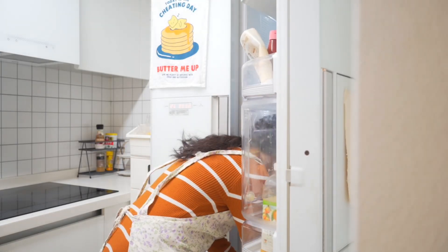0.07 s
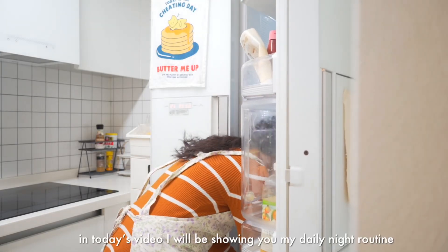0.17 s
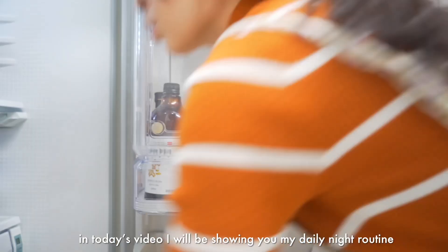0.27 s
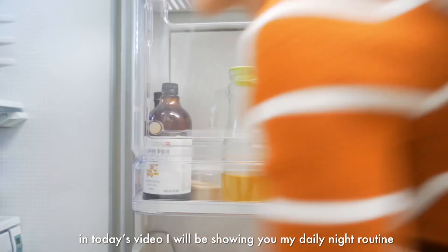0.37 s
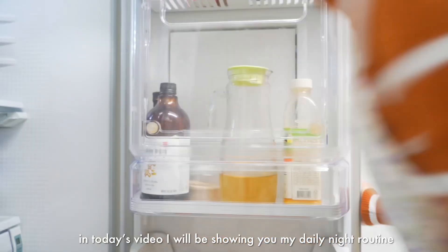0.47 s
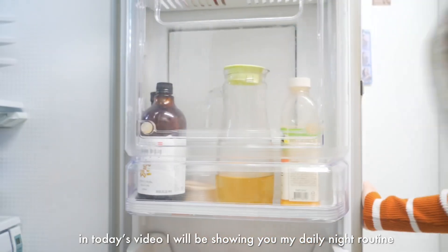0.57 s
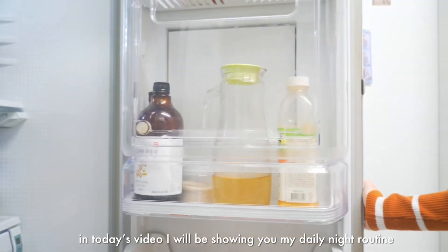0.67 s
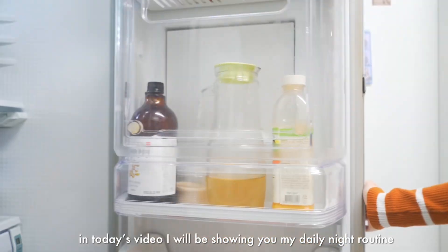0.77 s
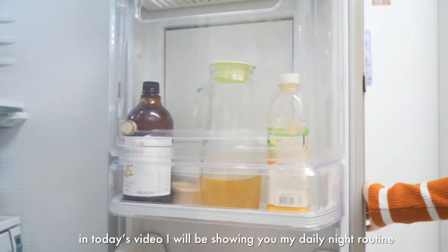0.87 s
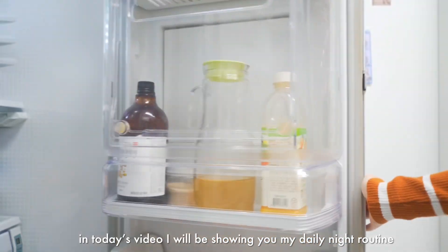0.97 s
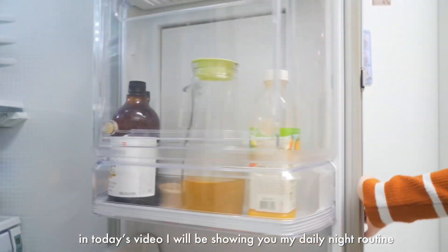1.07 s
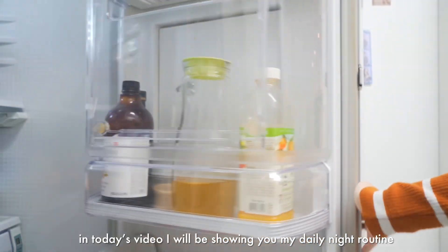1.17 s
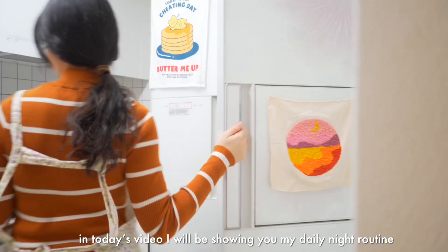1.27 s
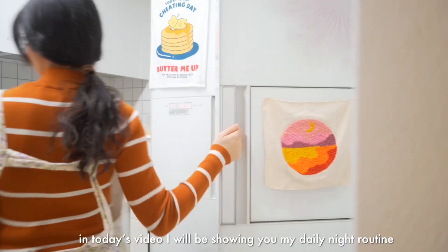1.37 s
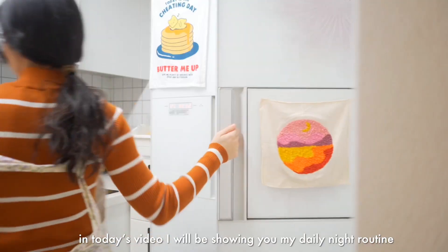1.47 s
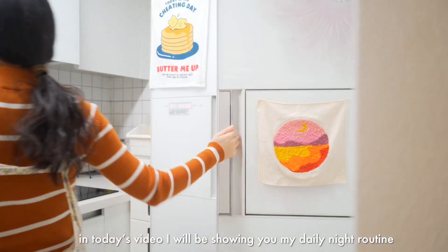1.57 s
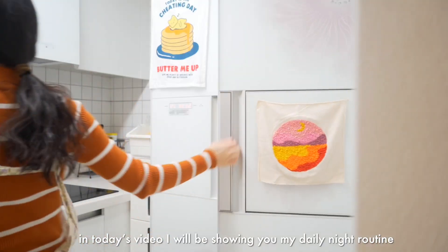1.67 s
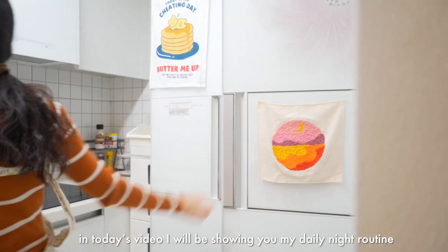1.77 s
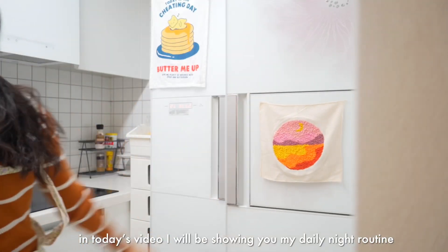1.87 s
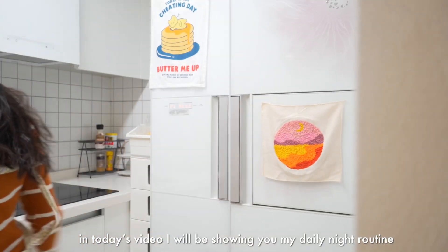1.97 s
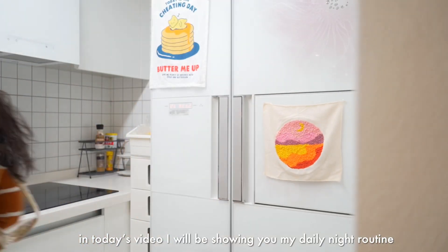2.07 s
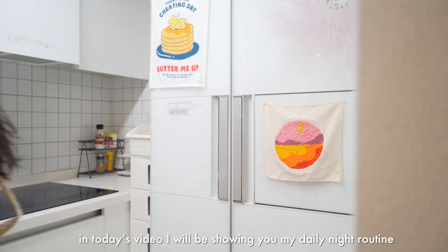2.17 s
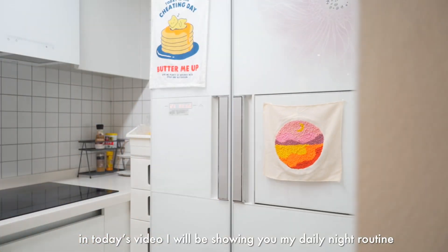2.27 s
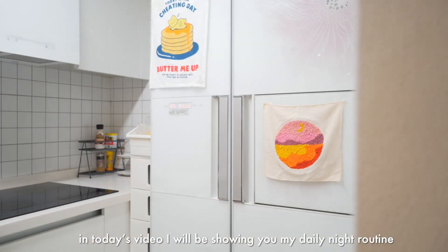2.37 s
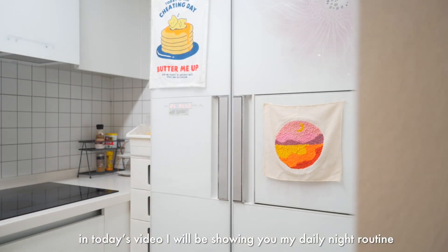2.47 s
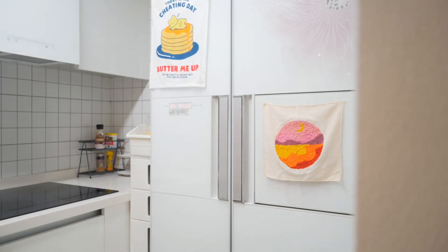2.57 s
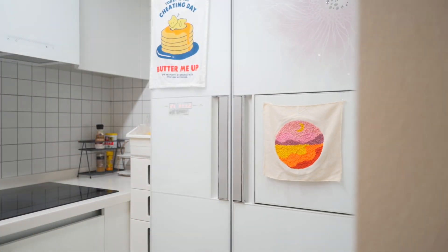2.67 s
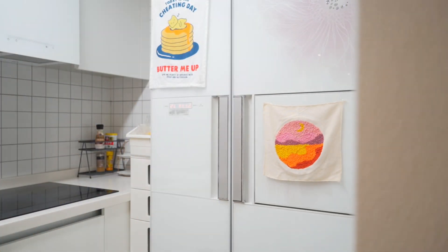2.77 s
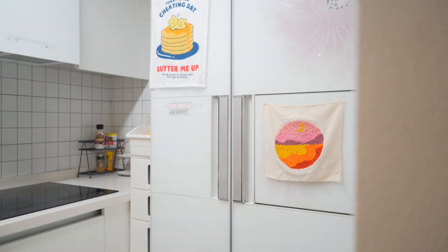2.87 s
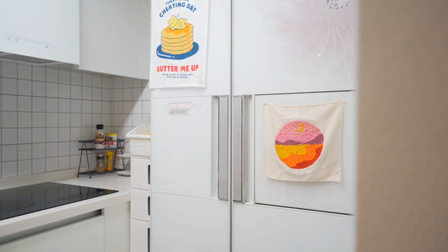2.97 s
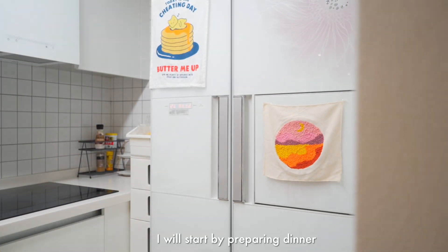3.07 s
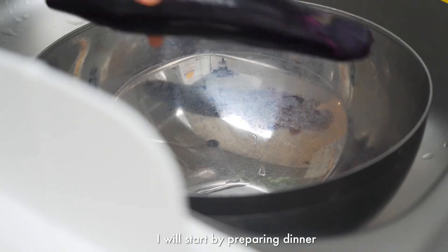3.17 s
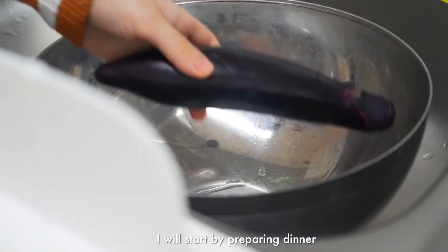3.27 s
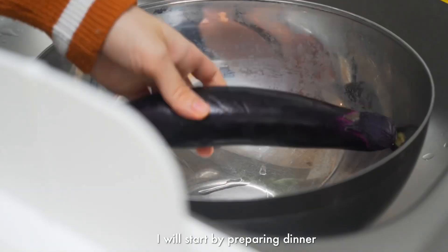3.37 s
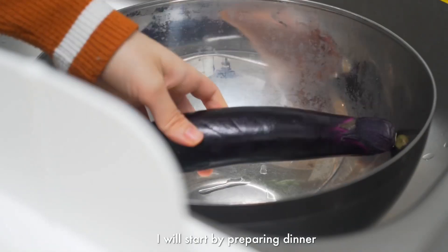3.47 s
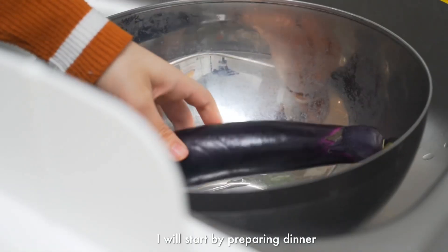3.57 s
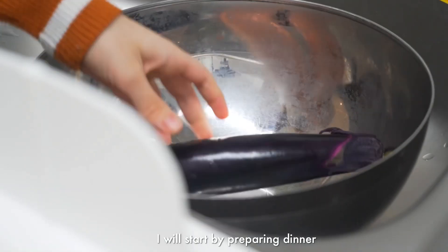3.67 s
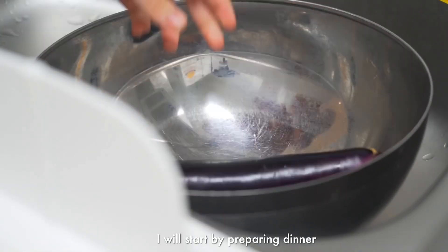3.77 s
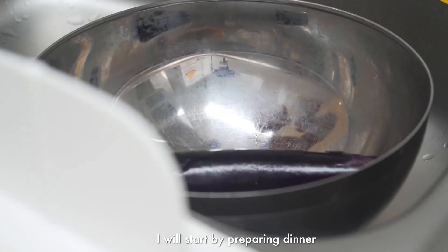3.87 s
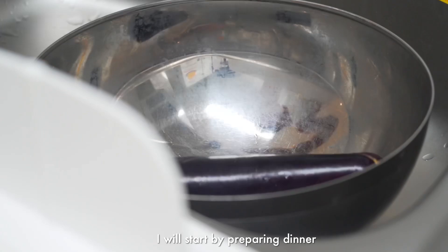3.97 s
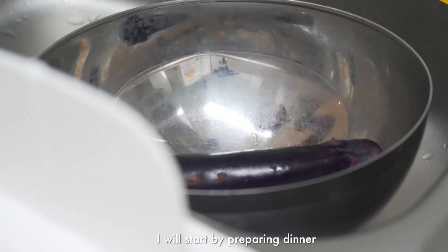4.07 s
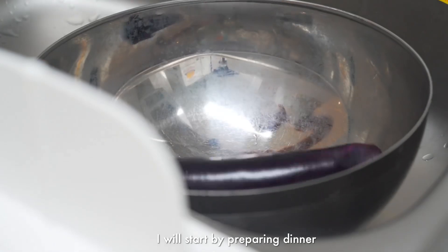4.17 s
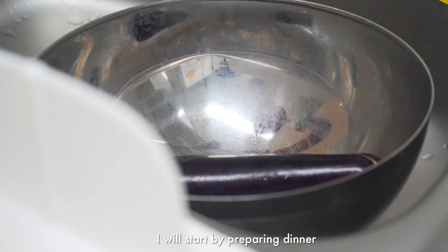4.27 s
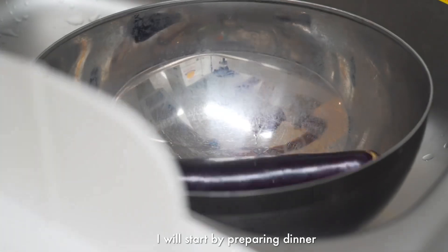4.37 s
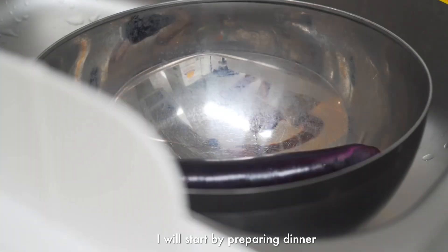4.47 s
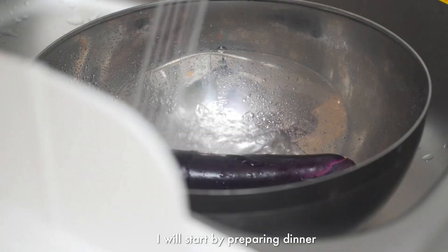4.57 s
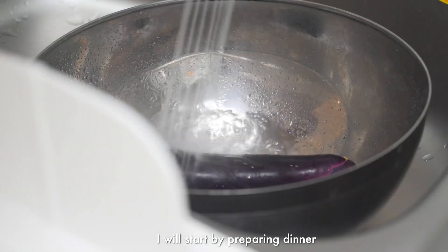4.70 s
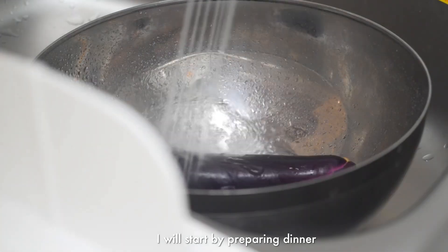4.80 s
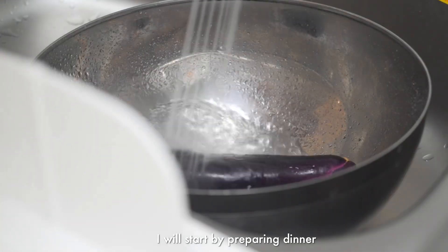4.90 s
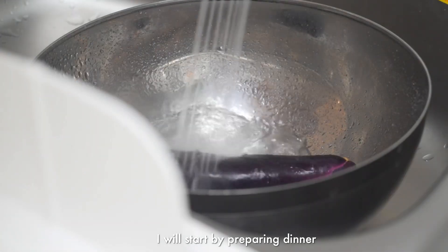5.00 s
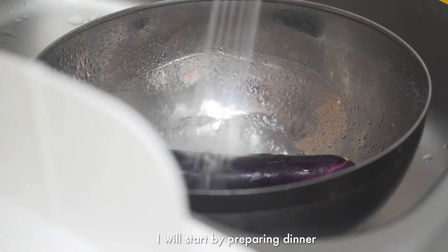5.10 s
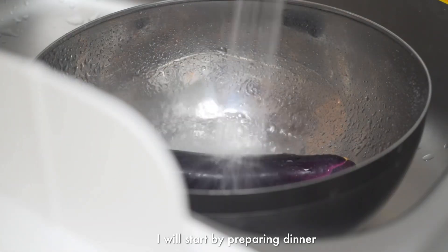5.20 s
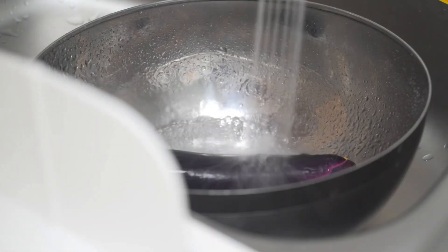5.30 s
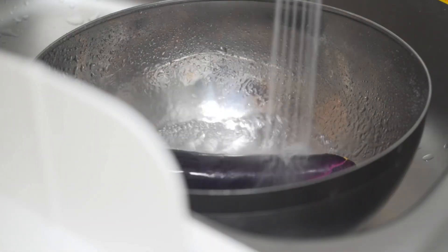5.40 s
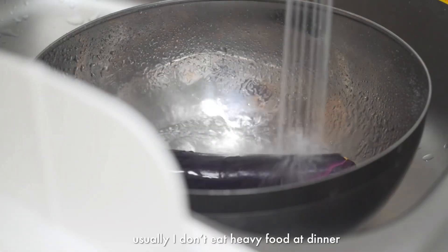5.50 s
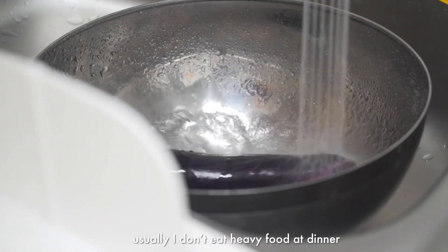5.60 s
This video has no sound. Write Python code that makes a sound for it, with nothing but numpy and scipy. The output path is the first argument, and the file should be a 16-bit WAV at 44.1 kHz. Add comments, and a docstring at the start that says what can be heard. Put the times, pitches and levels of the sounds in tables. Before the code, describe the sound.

Stereo recording of a home kitchen: quiet hum, light bag rustle, one sharp worktop knock, a low hinge creak, scuffs, then a loud boomy fridge slam and busy crackling and clatter. The sound cuts nearer to the sink: small knocks, dull thumps with short steel rings, a pause, a tap knock, and at once a dense steady water spray into a bowl, which suddenly thins to a fizzier sizzle and keeps running.

```python
"""A faint appliance hum fills a small hard kitchen while a bag crackles, slippers scuff, the worktop is knocked
and a fridge door swings, creaks and slams, its contents rattling dully. Then, close to the sink, a vegetable
drops into a steel bowl, the tap lever knocks and a spray of water drums on the bowl; near the end the sound
drops abruptly and sizzles more. Hum, rub and fizz are filtered noise; blows are noise bursts whose octaves die
at their own speeds; panel, cabinet, bowl and sink are resonant modes."""
import sys
import numpy as np
from scipy import signal
from scipy.fft import rfft, irfft
from scipy.io import wavfile
from scipy.ndimage import uniform_filter1d

SR = 44100
rng = np.random.default_rng(int(sys.argv[2]) if len(sys.argv) > 2 else 0)


def master(y):
    """Save y as 16-bit WAV."""
    cut = np.clip(np.atleast_2d(y).T, -1, 1)
    pcm = np.round(cut * 32767)  # scale
    wavfile.write(sys.argv[1], SR, pcm.astype(np.int16))


N = 248724
TIME = np.arange(N) / SR  # s

# stereo field of the room at two microphone ports, three curves: (frequency [Hz], likeness, held to 0..1),
# (frequency [Hz], phase by which left leads [rad]), (frequency [Hz], left minus right [dB])
FAR = ([(60, 2.5), (150, 0.95), (380, 0.88), (950, 0.64), (2380, 0.43), (3400, 0.0), (15000, 0.0)],
       [(50, 0), (500, .15), (2000, .6), (16000, 2)], [(60, 1), (240, 0), (950, 0.5), (3770, 1),
       (15000, 1.0)])


def gain_of(db):
    """Level definition: 20 dB is a factor of ten in amplitude."""
    return 10 ** (np.asarray(db) / 20)


def evened(x):
    """Normalisation to a root mean square of 1."""
    return x / np.sqrt(np.mean(x ** 2) + 1e-20)


def read(points, hz):
    """Interpolation of a spectrum along logarithmic frequency."""
    f, value = np.transpose(points)
    return np.interp(np.log(hz + 1), np.log(f + 1), value)


def curve(rows):
    """Linear interpolation in time: each column after the first, at every sample."""
    s, *columns = np.transpose(rows)
    return [np.interp(TIME, s, column) for column in columns]


def add(mix, s, sound):
    """Superposition: a sound joins the mix at s seconds."""
    part = mix[:, round(s * SR):][:, :sound.shape[1]]
    part += sound[:, :part.shape[1]]


def slowly(rate):
    """Slow random modulation of size 1: twelve sines from 0.8 Hz up to rate [Hz], at random phases."""
    t = np.arange(N // 64 + 2) * 64 / SR
    x = sum(np.sin(2 * np.pi * (f * t + rng.random())) for f in np.geomspace(.8, rate, 12))
    return np.interp(TIME, t, evened(x))


def pair(ports, size, crackle_db=0.):
    """Partial coherence: spectra of white noise at both ports, and their frequencies; crackle makes grains."""
    chance = uniform_filter1d(rng.exponential(1, size) - 1, size=24)
    grains = gain_of(crackle_db * evened(chance))
    a, b = rfft(rng.standard_normal((2, size)) * grains)
    hz = np.fft.rfftfreq(size, 1 / SR)
    same, lead, lean_db = (read(points, hz) for points in ports)
    same = np.clip(same, 0, 1)
    right = (same * a + np.sqrt(1 - same ** 2) * b) * np.exp(-1j * lead)
    return np.array([a * gain_of(lean_db / 2), right / gain_of(lean_db / 2)]), hz


def noise(colour, ports, patchy_db, crackle_db=0.):
    """Spectral shaping: coloured noise whose level drifts in patches over time and pitch."""
    z, hz = pair(ports, N, crackle_db)
    coloured = irfft(z * gain_of(read(colour, hz)), N)
    z = signal.stft(coloured, nperseg=512, noverlap=384)[2]
    patches = uniform_filter1d(rng.standard_normal(z.shape[1:]), size=5, axis=0)
    patches = uniform_filter1d(patches, size=16, axis=1)
    z = z * gain_of(patchy_db * evened(patches))
    return evened(signal.istft(z, nperseg=512, noverlap=384)[1][:, :N])


def ring(x, hz, width):
    """Resonance: one damped pole of gain 1 at its centre, width in Hz."""
    r = np.exp(-np.pi * width / SR)
    return 2 * signal.lfilter([1 - r], [1, -r * np.exp(2j * np.pi * hz / SR)], x).real


def favoured(hz, centre_hz, fall_db):
    """Modal excitation: the struck spot favours modes near one pitch; an octave away loses fall_db."""
    return gain_of(-fall_db * np.log2(hz / centre_hz) ** 2)


def blow(colour, decay, db, tilt_db, body_hz=1000, body_db=0, stretch=1, ports=FAR, size=32768):
    """Impact and reverberation: a burst heard with its room, sharp in front, each octave dying at its own speed."""
    z, hz = pair(ports, size)
    octave, t = np.log2((hz + 1) / 500), np.arange(size) / SR
    body = np.exp(-(np.log2((hz + 1) / body_hz) / 1.06) ** 2)
    z = z * gain_of(read(colour, hz) + tilt_db * octave + body_db * body)
    out = np.zeros((2, size))
    for k in range(-4, 6):
        mid = 500 * 2. ** k
        band = irfft(z * np.clip(1 - abs(octave - k), 0, 1), size)
        tail = gain_of(-60 * t / (read(decay, mid) * stretch))
        front = 0.86 * np.exp(-t / 0.014)
        out += band * (tail + front) * (1 - np.exp(-t * mid / .8))  # low octaves build up more slowly
    # peaks are taken to stand three times over the mean of the first 900 samples
    return gain_of(db) * out / (3 * np.sqrt(np.mean(out[:, :900] ** 2)))


def clang(modes, db, centre_hz, fall_db=22.0, contact=0.0075):
    """Forced modes: a short rough contact (time constant in s) sets them ringing; db is the mean of the onset."""
    z, _ = pair(FAR, 16384)
    touch = irfft(z, 16384) * np.exp(-np.arange(16384) / SR / contact)
    out = 0
    for hz, mode_db, t60 in modes:
        strength = gain_of(mode_db) * favoured(hz, centre_hz, fall_db) * t60
        out = out + strength * ring(touch, hz, 1.7 / t60)
    return gain_of(db) * out / np.sqrt(np.mean(out[:, :900] ** 2))


def boom(modes, db, centre_hz, fall_db=16.0):
    """Free decay of low modes after a soft heavy push, alike at both ports; each builds up within a cycle."""
    t = np.arange(32768) / SR
    out = 0
    for hz, mode_db, t60 in modes:
        envelope = gain_of(mode_db - 60 * t / t60) * (1 - np.exp(-t * hz / 0.33))
        tone = np.sin(2 * np.pi * (hz * t + rng.random()))
        out = out + envelope * favoured(hz, centre_hz, fall_db) * tone
    return gain_of(db) * out[None]


def room():
    """Stationary broadband noise: appliances hum low under a faint hiss."""
    # spectrum of the room tone: (frequency [Hz], level [dB per Hz])
    tone_colour = [(21, -37), (35, -8), (55, -13.5), (80, -9), (119, -11), (146, -12), (220, -8),
                   (438, -20.5), (565, -16), (610, -25), (829, -17), (1070, -32.5), (1150, -25.5),
                   (1280, -31.5), (8030, -37.5), (15600, -38)]
    # loudness of the room tone: (time [s], level [dB])
    tone_level = [(0, -50), (1.2, -49.5), (1.9, -44), (2.6, -45), (3.05, -47), (3.6, -47.5), (4.4, -48.5),
                  (5.64, -49.5)]
    return gain_of(curve(tone_level)[0]) * noise(tone_colour, FAR, patchy_db=1.5)


def drone():
    """Narrow-band noise: a low resonance sounds while the door stands open and swings."""
    # loudness of the drone: (time [s], level [dB])
    drone_level = [(0.2, -57), (0.4, -57), (0.644, -55), (0.83, -46), (1.064, -54), (1.204, -55),
                   (1.35, -65)]
    centre_hz, width_hz = 97, 27  # of each of the two resonances in a row
    once = ring(rng.standard_normal(N), centre_hz, width_hz)
    tone = evened(ring(once, centre_hz, width_hz))
    on = np.interp(TIME, [.2, .24, 1.25, 1.35], [0, 1, 1, 0])
    return on * gain_of(curve(drone_level)[0]) * tone


def snaps_and_worktop_knocks():
    """Impulsive excitation: snaps of the bag, scuffs and two worktop knocks, bursts with a favoured body pitch."""
    # snaps of the bag, scuffs, and two knocks on the worktop at 0.6 and 1.03 s:
    # (time [s], peak [dB], tilt [dB per octave], pitch of the body [Hz], body [dB])
    burst_events = [(0.235, -45, -3, 953, 19), (0.324, -41.5, 1.5, 950, 20), (0.509, -44, -1, 703, 10),
                    (0.598, -26, -1, 560, 15), (1.029, -38.5, -8, 568, 7), (1.366, -32, 3, 867, -2),
                    (1.54, -29.5, 5.5, 867, 5.0), (1.996, -24.5, -1, 471, -8), (2.121, -22, 2.5, 1200, 18),
                    (2.151, -19.5, 0, 425, 13), (2.174, -21.5, 0.0, 415, 24), (2.24, -21, 11, 425, 5.0),
                    (2.266, -20.5, 0.5, 1260, 1), (2.335, -22, 4, 700, 14), (2.388, -16, 3, 1960, 0),
                    (2.448, -24.5, 0, 895, 8), (2.47, -27, 9, 1030, 9), (2.506, -20, 0.0, 649, 3),
                    (2.561, -23.5, -11, 646, 1), (2.635, -19.5, -0.5, 1280, -1),
                    (2.728, -18, 0.5, 400, 14.5), (2.853, -18, -1.5, 2320, 11)]
    # spectrum of these bursts: (frequency [Hz], level [dB per Hz])
    burst_colour = [(100, -34), (200, -25), (500, -8), (1500, -3.5), (4000, -8.5), (14000, -8)]
    # reverberation of these bursts: (frequency [Hz], t60 [s])
    burst_decay = [(200, 0.062), (1000, 0.35), (4000, 0.21), (15000, 0.31)]
    mix = np.zeros((2, N))
    for s, db, tilt_db, body_hz, body_db in burst_events:
        add(mix, s, blow(burst_colour, burst_decay, db, tilt_db, body_hz, body_db))
    return mix


def slam():
    """Impact and cabinet modes: the door jolts, later meets its seal and bounces."""
    # each contact: (time [s], peak [dB], tilt [dB per octave], factor on the decay,
    # boom of the cabinet [dB], pitch it favours [Hz])
    contacts = [(0.236, -50, 0, 0.35, -46, 60), (1.972, -37, -7, 0.38, -27.5, 230),
                (2.007, -8, 1, 0.75, -10, 115), (2.015, -18, 0, 0.82, -32, 200),
                (2.041, -13.5, 0.5, 0.77, -21, 60.5), (2.151, -43, 0, 0.74, -21, 118)]
    # spectrum of the slam: (frequency [Hz], level [dB per Hz])
    slam_colour = [(59, -24), (100, -0.5), (326, -3.5), (554, -5), (699, -7.5), (760, -8.5), (1000, -7.5),
                   (2280, -25), (2480, -24), (4480, -26.5), (13500, -30.5), (15600, -40)]
    # reverberation of the slam: (frequency [Hz], t60 [s])
    slam_decay = [(50, 1), (120, 0.91), (300, 0.89), (1000, 0.87), (3000, 0.95), (12000, 0.7)]
    # modes of the cabinet: (frequency [Hz], level [dB], t60 [s])
    cabinet = [(50.8, 8, 0.31), (84.4, -6.5, 0.21), (120, -13.5, 0.37), (182, -4, 0.17), (225, -3.5, 0.24),
               (423, 2, 0.74), (643, -14, .3)]
    mix = np.zeros((2, N))
    for s, db, tilt_db, stretch, boom_db, boom_hz in contacts:
        add(mix, s, blow(slam_colour, slam_decay, db, tilt_db, stretch=stretch))
        add(mix, s, boom(cabinet, boom_db, boom_hz))
    return mix


def rustle():
    """Crackling and friction noise: plastic crackles; cloth, slippers and rattling door contents add a dull part."""
    # spectrum of the crackling plastic: (frequency [Hz], level [dB per Hz])
    hiss_colour = [(1180, -25), (2000, -12.5), (2290, -15.5), (3410, -8.5), (4600, -8), (5760, -6.5),
                   (8400, -6.5), (15600, -7)]
    # spectrum of the dull part: (frequency [Hz], level [dB per Hz])
    dull_colour = [(88, -48), (150, -10.5), (419, -2), (511, -10.5), (639, -9.5), (692, -7.5), (749, -8),
                   (3500, -14), (4550, -32), (7700, -120)]
    # crumples of bag and clothes; just after the slam, the dull rattle of things in the door:
    # (time of the top [s], hiss [dB], length [s], dull part over the hiss [dB])
    swells = [(0.26, -67, 0.2, 1), (0.535, -44.5, 0.13, -4.5), (0.601, -34, 0.06, -9),
              (0.68, -49, 0.32, -2), (1.033, -46, 0.21, -5), (1.277, -40.5, 0.2, -12),
              (1.37, -44.5, 0.25, -9.5), (1.513, -41, 0.42, -11.5), (1.74, -46, 0.5, -11),
              (2.026, -35.5, 0.15, 6.5), (2.13, -47.5, 0.12, 13.5), (2.269, -31.5, .08, -5.5),
              (2.365, -24, 0.33, -8.5), (2.576, -30, 0.16, -9.5), (2.636, -40, .05, -5),
              (2.761, -28.5, 0.25, -8.5), (2.851, -28.5, 0.17, -10), (3.062, -43, 0.15, -3.5)]
    swell_share, fade_db = 0.35, 16.5  # the swell takes this share of the length; a length later it is fade_db down
    start_s, stop_s = 0.238, 3.08
    stir_db, stir_dull_db = -53.5, -4  # faint steady stir, and its dull part over that
    t = np.arange(0, N / SR + .002, .001)
    hiss_power = gain_of(stir_db) ** 2
    dull_power = gain_of(stir_db + stir_dull_db) ** 2
    for s, db, length, dull_db in swells:
        away = np.maximum(t - s, (s - t) / swell_share) / length
        power = gain_of(db - fade_db * away) ** 2
        hiss_power = hiss_power + power
        dull_power = dull_power + power * gain_of(dull_db) ** 2
    on = np.interp(t, [start_s - .005, start_s + .005, stop_s - .01, stop_s + 0.0069], [0, 1, 1, 0])
    hiss_gain = np.interp(TIME, t, on * np.sqrt(hiss_power))
    dull_gain = np.interp(TIME, t, on * np.sqrt(dull_power))
    hiss = noise(hiss_colour, FAR, patchy_db=2.5, crackle_db=1.0)
    dull = noise(dull_colour, FAR, patchy_db=2.15, crackle_db=1.5)
    return hiss_gain * hiss + dull_gain * dull


def creak():
    """Stick-slip: uneven slips of the hinge, about forty a second, ring the panel."""
    # the hinge drags: (time [s], force [dB])
    drag = [(0.72, -61), (0.756, -36.5), (0.83, -43), (0.872, -23), (0.9, -28), (0.968, -43.5), (1.04, -43)]
    # resonances of the door panel: (frequency [Hz], width [Hz], level [dB])
    panel = [(102, 44, 2.5), (201, 50, 9), (253, 41, 1.1)]
    begin, end = drag[0][0], drag[-1][0]
    on = np.interp(TIME, [begin, begin + .03, end - .03, end], [0, 1, 1, 0])
    slip_hz = 42 * (1 + 0.241 * slowly(30))
    slips = np.diff(np.floor(np.cumsum(slip_hz) / SR), prepend=0)
    soft = signal.oaconvolve(slips, np.diff(np.hanning(240)), "same")  # the rubber of the hinge rounds each slip
    shake = sum(gain_of(db) * ring(ring(soft, hz, width), hz, 2 * width) for hz, width, db in panel)
    return on * gain_of(curve(drag)[0]) * evened(shake)


def sink_knocks():
    """Impact: things are set down by the sink; the last knock is the tap lever, whose modes ring too."""
    # each knock: (time [s], peak [dB], tilt [dB per octave], factor on the decay)
    knock_events = [(3.077, -23, 0, 0.87), (3.114, -24, -2, 0.77), (4.407, -21, 2.5, 1.1)]
    # spectrum of a knock: (frequency [Hz], level [dB per Hz])
    knock_colour = [(35, -39), (60, -2), (707, -0.5), (913, -4.5), (1490, -2.5), (2790, -18.5),
                    (3520, -8.5), (4140, -20), (10500, -29), (12700, -28), (15600, -40)]
    # reverberation of a knock: (frequency [Hz], t60 [s])
    knock_decay = [(100, 0.29), (500, 0.45), (2000, 0.5), (10000, 0.26)]
    # modes of the tap lever: (frequency [Hz], level [dB], t60 [s])
    lever = [(307, 3.5, 0.083), (470, -1, 0.35), (798, -1, 0.066), (1130, -6, 0.1), (1530, -12, 0.13),
             (2370, -18, 0.14), (3300, 1, 0.15), (3450, 4, .18), (3710, 6, 0.13)]
    mix = np.zeros((2, N))
    for s, db, tilt_db, stretch in knock_events:
        add(mix, s, blow(knock_colour, knock_decay, db, tilt_db, stretch=stretch))
    # the negative fall slightly lifts modes away from the centre
    add(mix, knock_events[-1][0], clang(lever, db=-30, centre_hz=1500, fall_db=-0.3, contact=0.0029))
    return mix


def drops():
    """Impact on coupled bodies: each contact with the bowl is a thud, a ring of steel and a boom of the sink."""
    # the vegetable lands and rolls; the last row is a dull thump under the running water:
    # (time [s], thud peak [dB], tilt [dB per octave], ring of the steel [dB],
    # pitch it favours [Hz], boom of the sink [dB], pitch it favours [Hz])
    contacts = [(3.3, -41, -3, -66, 500, -21, 127), (3.322, -26.5, -1, -37.5, 2200, -20, 105),
                (3.33, -28, -0.5, -47, 500, -23, 395), (3.499, -44, 5, -52.5, 2580, -63, 200),
                (3.528, -24, 3.5, -39, 5440, -24.5, 204), (3.55, -25.5, -2.5, -46.5, 2200, -27, 71.5),
                (3.631, -47, 4, -71, 1020, -36, 111), (3.902, -55, 6, -64, 2500, -62, 200),
                (4.078, -32.5, 0.5, -52.5, 1370, -29, 220), (4.102, -46, -4, -53, 500, -31.5, 71.4),
                (4.118, -39, -1.5, -51, 500, -32.5, 265), (5.47, -51, 11, -54, 500, -33.5, 112)]
    # spectrum of the thud: (frequency [Hz], level [dB per Hz])
    thud_colour = [(59, -9), (100, -7.5), (430, -5), (881, -20.5), (1180, -12), (1340, -26.5),
                   (2230, -27.5), (2480, -36), (3790, -31), (4480, -34), (5660, -26.5), (15600, -49)]
    # reverberation of the thud: (frequency [Hz], t60 [s])
    thud_decay = [(60, 1), (250, 0.55), (1000, 0.35), (4000, 0.32), (12000, 0.32)]
    # modes of the steel bowl: (frequency [Hz], level [dB], t60 [s])
    bowl = [(420, -4, .07), (580, -4, .07), (1200, 2, .06), (1600, -6, .05), (2150, -4, .05),
            (2300, -4, .04), (2690, -8, .05), (3340, -8, .05), (3880, -6, .05), (4800, 1, .03),
            (5300, 2, .04), (5700, 2, .04), (6680, -3, .04)]
    # modes of the sink under the bowl: (frequency [Hz], level [dB], t60 [s])
    sink = [(69.6, 4, 0.25), (119.7, -0.5, 0.22), (219, 3.5, 0.076), (263.7, -7.5, 0.42), (410, -2, 0.14)]
    mix = np.zeros((2, N))
    for s, db, tilt_db, steel_db, steel_hz, sink_db, sink_hz in contacts:
        add(mix, s, blow(thud_colour, thud_decay, db, tilt_db))
        add(mix, s, boom(sink, sink_db, sink_hz))
        add(mix, s, clang(bowl, steel_db, steel_hz))
    return mix


def water():
    """Random forcing of resonances: fine jets fizz as they break, and their patter drives the wet steel."""
    # the spray shifts over the bowl; at 5.47 s the sound drops abruptly and sizzles more: (time [s], force
    # [dB], place: 0 on the bare middle, 1 over at the side)
    spray = [(4.488, -2.5, 0.12), (4.6, 1, 0.26), (4.81, -.5, 0.23), (4.9, -0.5, 0.039), (5.13, 0, 0),
             (5.19, .5, 0.34), (5.468, 0, 0.67), (5.472, -3, 0.75), (5.64, -2, 0.92)]
    # spectrum of the fizz: (frequency [Hz], level [dB per Hz])
    fizz_colour = [(200, -42), (300, -29), (400, -20), (480, -22), (600, -12), (860, -12), (1300, -5),
                   (2500, -3), (3500, -3), (4100, -4), (4900, -5), (6300, -5.5), (10900, -6), (14700, -1)]
    # resonances of the wet steel under the jets: (frequency [Hz], width [Hz], level [dB])
    drummed = [(405, 43, -13), (576.3, 45.5, -1), (612.5, 41, -1), (660.5, 42, 0), (724, 52, -8.5),
               (796, 40, -13), (966, 93, 0), (1034, 58, 3), (1145, 100, -1), (1497, 144, -1.5),
               (1780, 69, 3), (1954, 120, -6.5), (2222, 51, 0.5), (2330, 85, -2), (2518, 130, -3.5),
               (2824, 150, -2), (2930, 82, -6.5), (3088, 200, -2), (3366, 21, -2), (3490, 34, -6),
               (3700, 60, -5)]
    # stereo field close to the ports, three curves: (frequency [Hz], likeness),
    # (frequency [Hz], phase by which left leads [rad]), (frequency [Hz], left minus right [dB])
    near = ([(60, 1.0), (150, 1.0), (380, 0.95), (950, 0.75), (2380, 0.7), (5980, 0.4), (15000, 0.26)],
            [(0, 0), (860, 0.1), (1210, 0.1), (4570, -0.1), (13400, -0.4), (16600, -1.1)], [(60, 0.0),
            (180, 0.0), (550, 0.0), (1650, -2.5), (4970, -1.0), (15000, -1.0)])
    fizz_db, high_db = -19.5, -27  # fizz and high modes at force 0
    low_db, sizzle_db = (-29.5, -45), (-39.5, -22)  # low modes and sizzle at force 0, with the jets at place 0 and 1
    sizzle_hz, sizzle_width_hz = 6250, 1400  # where fine drops sizzle
    split_hz, wander_db = 850, (0.9, 1.66)  # low and high modes part here; how far each group swells and fades
    force_db, place = curve(spray)
    low_gain = gain_of(low_db[0] + (low_db[1] - low_db[0]) * place)
    sizzle_gain = gain_of(sizzle_db[0] + (sizzle_db[1] - sizzle_db[0]) * place ** 2)
    on = np.clip((TIME - spray[0][0]) / 0.0023, 0, 1)
    fizz = noise(fizz_colour, near, patchy_db=0.4, crackle_db=0.5)
    start = round(4.4 * SR)  # the modes are driven from shortly before the spray is let in
    patter = noise([(100, 0), (16000, 0)], near, patchy_db=1.86, crackle_db=2.5)
    low, high = np.zeros((2, 2, N))
    for hz, width, db in drummed:  # each mode swells and fades on its own
        mode = ring(ring(patter[:, start:], hz, width), hz, width)
        wander = wander_db[hz >= split_hz] * slowly(16)[start:]
        add(low if hz < split_hz else high, start / SR, mode * gain_of(db + wander))
    low, high = (x / np.sqrt(np.mean(x[:, start:] ** 2)) for x in (low, high))
    sizzle = evened(ring(ring(patter, sizzle_hz, sizzle_width_hz), sizzle_hz, sizzle_width_hz))
    drumming = low_gain * low + gain_of(high_db) * high
    return on * gain_of(force_db) * (gain_of(fizz_db) * fizz + drumming + sizzle_gain * sizzle)


def scene():
    """Superposition of all sources at the two ports."""
    door_and_bag = drone() + snaps_and_worktop_knocks() + slam() + rustle() + creak()
    at_the_sink = sink_knocks() + drops() + water()
    return room() + door_and_bag + at_the_sink


def record(dry):
    """Band limitation: a steep linear-phase low-pass stands for the recorder."""
    edge_hz = 15750
    low_pass = signal.firwin(2047, edge_hz, window=("kaiser", 7), fs=SR)
    return signal.oaconvolve(dry, low_pass[None], "same")


dry = scene()
out = record(dry)
master(out)
```